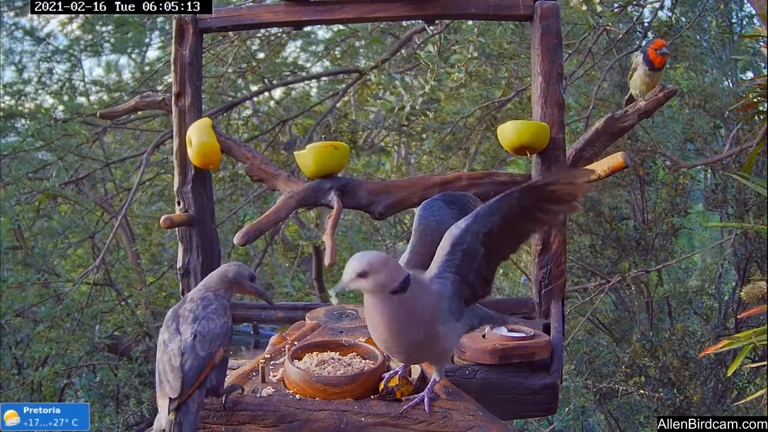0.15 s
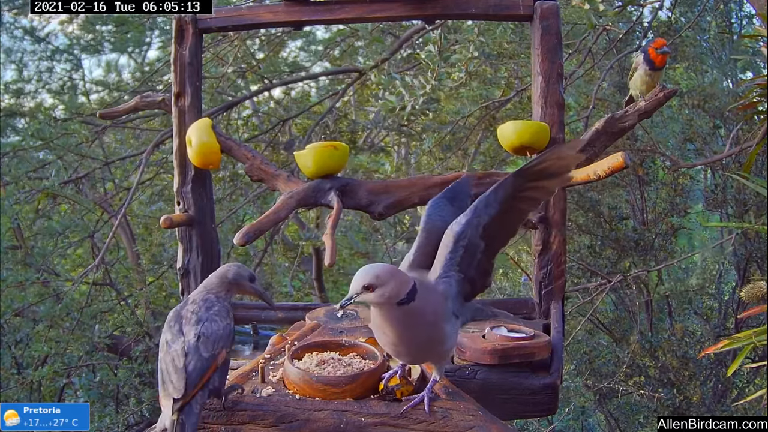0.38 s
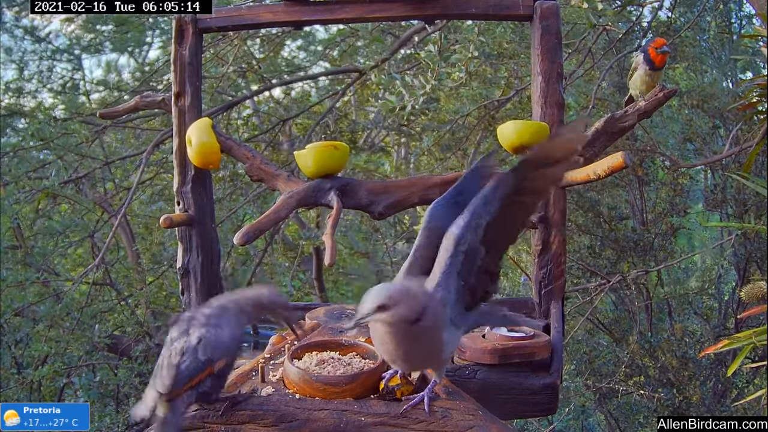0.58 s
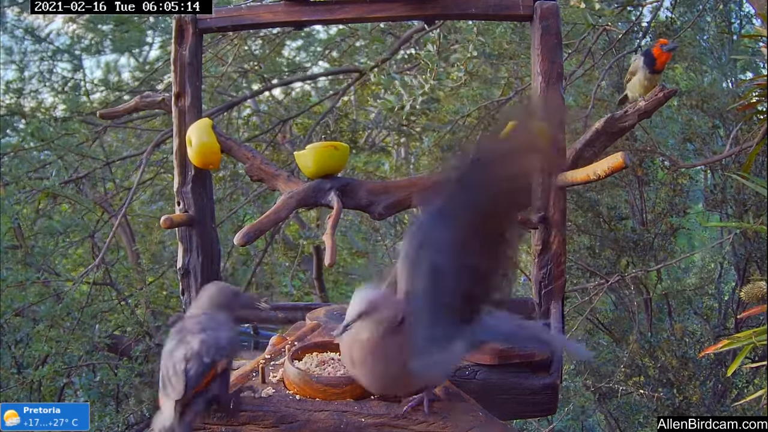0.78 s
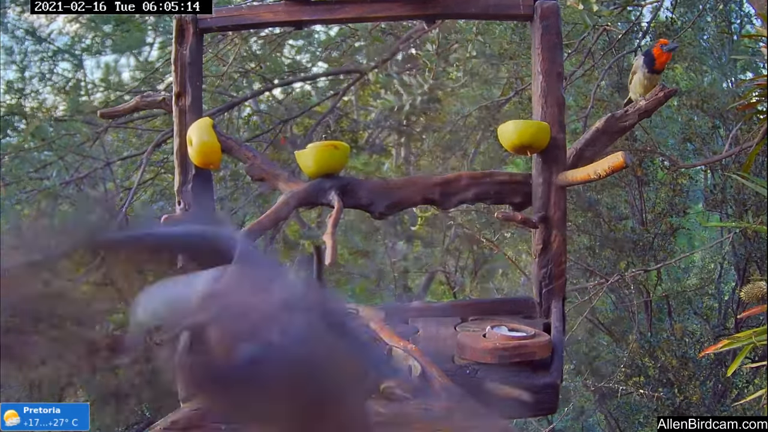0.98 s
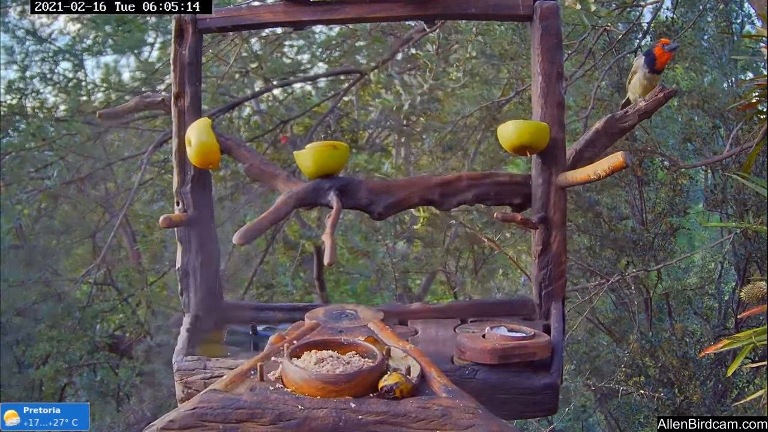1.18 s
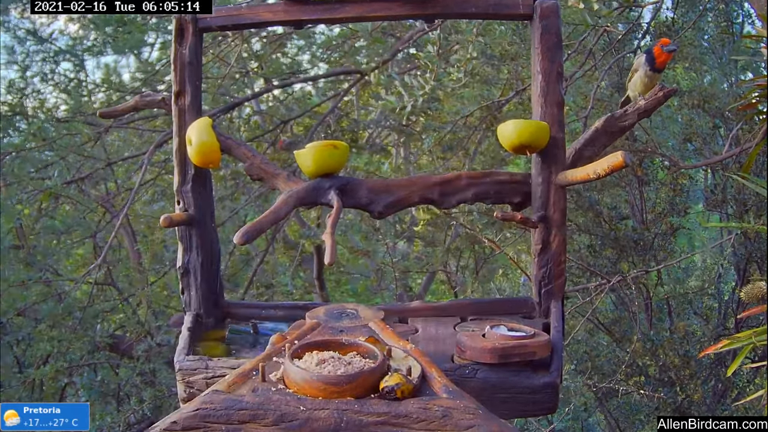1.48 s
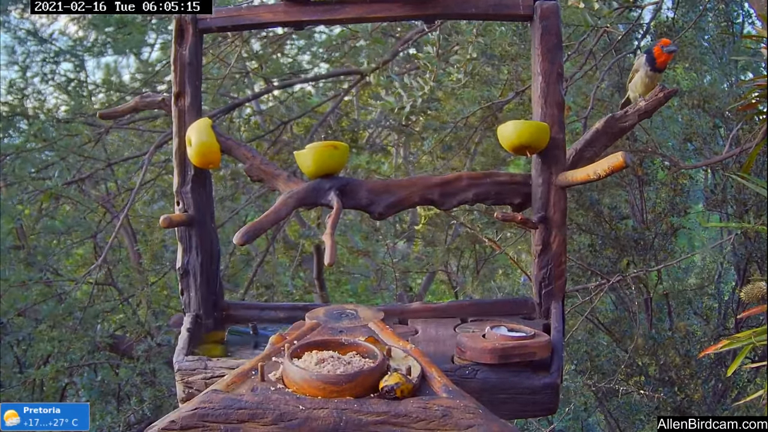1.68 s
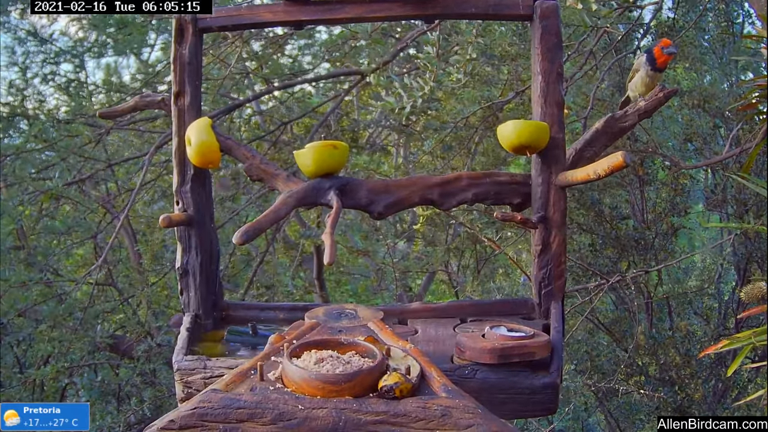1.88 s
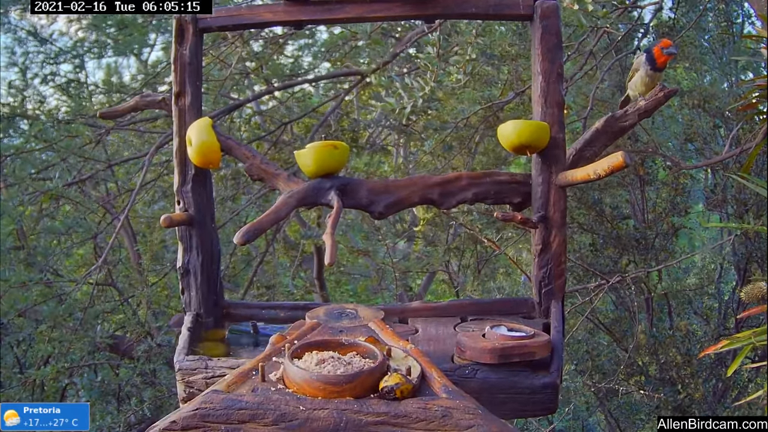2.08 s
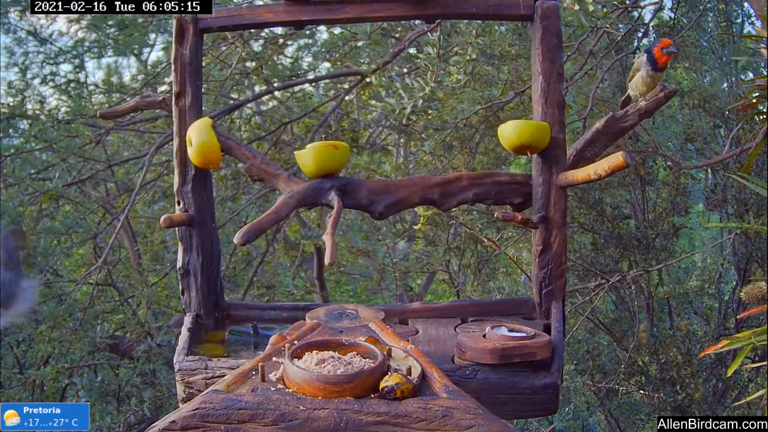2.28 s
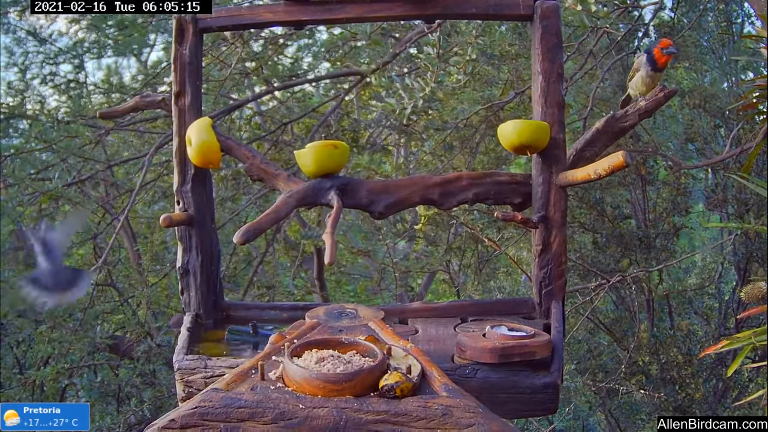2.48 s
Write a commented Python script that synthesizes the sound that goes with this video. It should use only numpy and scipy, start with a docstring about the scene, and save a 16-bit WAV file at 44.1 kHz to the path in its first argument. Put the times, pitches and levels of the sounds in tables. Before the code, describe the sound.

Close wing slaps and feathery swishes burst out just after one short chirp, as two doves take off from a garden feeder with soft wooden knocks. The flapping dies away while wind keeps rumbling on the microphone.

```python
"""A garden, close to a wooden feeder. Two doves scuffle and fly off: wings slap and clap, feathers swish
and whistle, downstrokes push air on the microphone, the planks knock and the seed dish rings.
A sharp chirp dies away at the start and small birds call far off. Wind buffets the microphone
over a distant traffic drone, a hum and faint hiss."""
import sys
import numpy as np
from scipy import signal
from scipy.fft import rfft, irfft, next_fast_len
from scipy.io import wavfile
from scipy.ndimage import uniform_filter1d, map_coordinates

SR = 44100
rng = np.random.default_rng(int(sys.argv[2]) if len(sys.argv) > 2 else 0)


def master(y):
    """Save y as 16-bit WAV."""
    cut = np.clip(np.atleast_2d(y).T, -1, 1)
    pcm = np.round(cut * 32767)  # scale
    wavfile.write(sys.argv[1], SR, pcm.astype(np.int16))


N = 116865
T = np.arange(N) / SR

# garden reverberation: freq_hz, t60_s
GARDEN_DECAY = [(500, 0.32), (3000, 0.15), (6000, 0.32), (10000, 0.13), (15000, 0.36)]


def amp(db):
    return 10 ** (np.asarray(db) / 20)


def unit_rms(x):
    return x / np.sqrt(np.mean(x ** 2) + 1e-20)


def log_interp(points, hz):
    """Interpolate (freq_hz, value) points on a log axis."""
    freqs_hz, values = np.transpose(points)
    return np.interp(np.log(hz + 1), np.log(freqs_hz + 1), values)


def bell(hz, centre_hz, width_oct):
    """Gaussian on a log axis, 1 at the centre."""
    return np.exp(-(np.log2((hz + 1) / centre_hz) / width_oct) ** 2)


def wobble(rate_hz, size=N):
    """Smooth random curve, rate_hz knots a second."""
    return map_coordinates(rng.standard_normal(int(size * rate_hz / SR) + 4), [T[:size] * rate_hz])


def filtered(x, response):
    """Apply the gain response(hz)."""
    n_fft = next_fast_len(len(x) + 8192)
    return irfft(rfft(x, n_fft) * response(np.fft.rfftfreq(n_fft, 1 / SR)), n_fft)[:len(x)]


def noise(spectrum, size=N):
    """Coloured noise, rms 1."""
    return unit_rms(filtered(rng.standard_normal(size), lambda hz: amp(log_interp(spectrum, hz))))


def patchy(x, depth_db):
    """Random louder and softer patches in time and frequency, rms 1."""
    bins = signal.stft(x, nperseg=1024)[2]
    field = uniform_filter1d(rng.standard_normal(bins.shape), size=5, axis=0)
    field = unit_rms(uniform_filter1d(field, size=5, axis=1))
    return unit_rms(signal.istft(bins * amp(depth_db * field), nperseg=1024)[1][:N])


def reverb_tail(decay):
    """Noise dying at a separate rate per frequency, energy 1."""
    hz, t, bins = signal.stft(rng.standard_normal(SR // 2), SR, nperseg=256)
    x = signal.istft(bins * amp(-60 * t / log_interp(decay, hz)[:, None]), SR, nperseg=256)[1]
    return x / np.linalg.norm(x)


def add(track, start_s, x):
    part = track[max(round(start_s * SR), 0):][:len(x)]
    part += x[:len(part)]


def hiss():
    """Microphone self-noise."""
    # freq_hz, gain_db
    spectrum = [(1180, -33.5), (2000, -5), (2500, -6.5), (2980, -2), (3600, -5.5), (14700, -24),
                (15800, -32)]
    return amp(-77.5 + 0.88 * wobble(30)) * noise(spectrum)


def drone():
    """Rush of far traffic and stirred air, with a distant narrow-band hum."""
    # rush contour: time_s, gain_db
    contour = [(0.0, -55.5), (0.29, -53), (0.41, -45.5), (0.52, -44.5), (1.01, -52), (1.76, -55.5),
               (2.23, -55), (2.39, -52), (2.62, -50.5)]
    # rush: freq_hz, gain_db
    spectrum = [(35, -23.5), (60, 1), (120, -8.5), (199, -17.5), (229, -10.5), (264, -12), (304, -10.5),
                (481, -20), (546, -14.5), (649, -17.5), (890, -20), (1220, -29.5), (1470, -29.5),
                (1590, -32.5), (2600, -56.5), (3380, -78.5), (5720, -120)]
    hum_hz, hum_width_hz, hum_db = 113.1, 8, -55.5
    level = amp(np.interp(T, *np.transpose(contour)) + 7.5)
    rush = patchy(amp(1.4 * wobble(44.85)) * noise(spectrum), depth_db=2.5)
    hum = filtered(rng.standard_normal(N), lambda hz: np.exp(-((hz - hum_hz) / hum_width_hz) ** 2))
    return level * rush + amp(hum_db) * unit_rms(hum)


def wind():
    """Gusts buffet the microphone: a deep, uneven rumble."""
    # time_s, level_db
    gusts = [(0, -55), (.12, -38), (.2, -38), (.3, -28), (.5, -28), (.8, -28.5), (1, -27.5), (1.15, -36.5),
             (1.35, -34), (1.5, -29), (1.58, -45), (1.66, -30), (1.8, -33.5), (2, -31.5), (2.2, -31),
             (2.28, -46), (2.38, -32), (2.65, -29.5)]
    # buffeting: freq_hz, gain_db
    spectrum = [(1.8, -32), (3.0, 0), (19, -2.5), (29, -9), (43, -10.5), (82, -22), (136, -40.5),
                (200, -39.5), (260, -73.5), (440, -120)]
    rumble = unit_rms(amp(1.6 * wobble(9)) * noise(spectrum))
    return amp(np.interp(T, *np.transpose(gusts))) * rumble


def far_birds():
    """Faint arched whistles, blurred by distance."""
    # start_s, length_s, start_hz, mid_hz, end_hz, level_db
    calls = [(0.982, 0.076, 3030, 3110, 3135, -72.5), (1.397, 0.036, 3475, 3740, 3444, -77.5),
             (1.438, .055, 3400, 3830, 3426, -80.5), (2.078, 0.082, 3050, 2990, 2750, -78.5),
             (2.166, 0.098, 2960, 3060, 3000, -82.5)]
    out = np.zeros(N)
    for start_s, length_s, start_hz, mid_hz, end_hz, level_db in calls:
        u = np.linspace(-1, 1, int(length_s * SR))
        pitch_hz = mid_hz + (end_hz - start_hz) * u / 2 + ((start_hz + end_hz) / 2 - mid_hz) * u * u
        tone = np.sin(2 * np.pi * np.cumsum(pitch_hz) / SR)
        add(out, start_s, amp(level_db) * np.sqrt(1 - u * u) * tone)
    direct = out * amp(5.7 * wobble(250))
    return direct + 0.86 * signal.fftconvolve(out, reverb_tail(GARDEN_DECAY))[:N]


def chirp():
    """A harsh near chip and its flickering echoes from the bushes."""
    # time_s, pitch_hz, level_db
    contour = [(0, 3530, -34), (.002, 4150, -25.5), (.005, 4400, -31.5), (.008, 4220, -28.5),
               (0.009, 3620, -59)]
    # freq_hz, gain_db
    echo_spectrum = [(1200, -32), (2000, -22.5), (3000, -13.5), (3900, -11), (4450, -2), (5000, -9),
                     (6500, -12.5), (7600, -25), (9600, -21), (13000, -49)]
    # freq_hz, t60_s
    echo_decay = [(2500, 0.17), (4400, 0.26), (6000, .22), (10000, 0.18)]
    roughness, overtone_db, echo_db = 0.69, -23.5, -38
    time_s, pitch_hz, level_db = np.transpose(contour)
    phase = 2 * np.pi * np.cumsum(np.interp(T, time_s, pitch_hz)) / SR
    envelope = amp(np.interp(T, time_s, level_db, right=-140)) * (1 + roughness * wobble(900))
    out = envelope * (np.sin(phase) + amp(overtone_db) * np.sin(2.2 * phase))
    echo = filtered(reverb_tail(echo_decay), lambda hz: amp(log_interp(echo_spectrum, hz)))
    echo /= np.std(echo[:SR // 50])
    add(out, 0, amp(echo_db) * echo * amp(1.2 * wobble(400, len(echo))))
    return out


def feeder_knocks():
    """Soft blows ring the planks, most strongly near each blow's centre frequency."""
    # start_s, level_db, centre_hz
    knocks = [(0.243, -31, 286), (.321, -35, 313), (0.478, -49, 305), (.604, -27, 330), (.635, -31, 280),
              (0.973, -33, 226), (1.074, -40, 305), (2.194, -41, 283), (2.235, -28, 225),
              (2.588, -40.5, 330)]
    # freq_hz, gain_db, t60_s
    plank_modes = [(113.7, -1, 0.11), (221.5, 0.5, 0.17), (301.4, 4.5, 0.11), (390, -10, 0.073),
                   (643, -11, 0.026)]
    rise_s = 0.0042
    out, t = np.zeros(N), T[:SR // 4]
    for start_s, level_db, centre_hz in knocks:
        ring = np.zeros(len(t))
        for hz, gain_db, t60_s in plank_modes:
            decay = amp(gain_db + rng.normal(0, 1.4) - 60 * t / t60_s)
            ring += bell(hz, centre_hz, width_oct=0.45) * decay * np.sin(2 * np.pi * hz * t)
        add(out, start_s, amp(level_db) * ring * (1 - np.exp(-t / rise_s)))
    return out


def air_puffs():
    """Downstrokes and gusts push air on the microphone; suction follows."""
    # peak_s, level_db, half_length_s
    puffs = [(0.367, -14, 0.018), (0.494, -13, 0.023), (0.613, -9.5, .014), (0.711, -18, 0.017),
             (0.812, -21, 0.017), (0.957, -25, 0.016), (1.251, -20, 0.051), (1.685, -19, 0.0241),
             (1.923, -24.5, 0.054), (2.063, -19.5, 0.029), (2.193, -17.5, 0.019)]
    out = np.zeros(N)
    for peak_s, level_db, half_length_s in puffs:
        u = (T - peak_s) / half_length_s
        push = np.exp(-2 * abs(u) ** 1.51)
        suction = 0.6 * np.exp(-(u - 1.71) ** 2)
        out += amp(level_db) * (push - suction)
    return out


def feather_swishes():
    """Feathers brush the air: one swell of noise per stroke."""
    # peak_s, level_db
    strokes = [(.232, -56.5), (.275, -69), (.3, -57), (.345, -55.5), (.385, -56), (0.422, -61.5),
               (0.468, -54), (0.509, -56.5), (.54, -62.5), (.605, -56.5), (.655, -68.5), (0.713, -60),
               (0.744, -69.5), (0.776, -75.5), (.82, -71), (0.869, -71), (.96, -73), (0.994, -75.5),
               (1.074, -71), (1.12, -76), (1.25, -80.5)]
    # swish: freq_hz, gain_db
    spectrum = [(700, -29.5), (1200, -4), (2000, -3.5), (2500, -5.5), (3200, 1), (5500, 3), (7000, -5.5),
                (9000, -16), (14000, -33)]
    rise_s, fall_s = 0.0075, 0.035
    envelope = np.zeros(N)
    for peak_s, level_db in strokes:
        width_s = np.where(T < peak_s, rise_s, fall_s)
        envelope += amp(level_db) * np.exp(-((T - peak_s) / width_s) ** 2)
    return envelope * amp(1.2 * wobble(130)) * patchy(noise(spectrum), depth_db=1.1)


def feather_whistles():
    """Feathers sound a brief fluttering tone on some strokes."""
    # time_s, level_db, pitch_hz, length_s
    whistles = [(0.36, -37, 653, 0.015), (0.494, -35, 836, 0.02), (0.513, -32, 854, 0.013),
                (0.522, -29.5, 820, 0.012), (0.599, -28, 870, 0.017), (0.728, -34.5, 766, 0.012),
                (0.749, -36.5, 673, 0.0098), (0.842, -45, 840, 0.011), (0.865, -33.5, 897, 0.018),
                (0.939, -46, 800, 0.013), (0.996, -43, 863, 0.012), (1.115, -40.5, 861, 0.013),
                (1.252, -41, 766, 0.0072), (1.33, -43, 766, 0.012), (1.551, -43, 895, 0.017)]
    out = np.zeros(N)
    for time_s, level_db, pitch_hz, length_s in whistles:
        t = T[:int(length_s * SR)]
        flutter = 0.9 + 0.43 * wobble(319, len(t))
        tone = np.sin(2 * np.pi * (pitch_hz * t + rng.random()))
        add(out, time_s - 0.002, amp(level_db) * np.hanning(len(t)) * flutter * tone)
    return out


def wing_thumps():
    """Body of the hardest slaps: one negative pressure pulse each."""
    # start_s, level_db, length_s
    thumps = [(.2442, -14, 0.0047), (0.26, -22.5, 0.0042), (0.3214, -23, 0.0026), (0.695, -27, 0.0022)]
    out = np.zeros(N)
    for start_s, level_db, length_s in thumps:
        add(out, start_s, -amp(level_db) * np.hanning(int(length_s * SR) + 2))
    return out


def wing_slaps():
    """Wing slaps and claw ticks: noise bursts that ring the seed dish and echo in the garden."""
    # start_s, peak_db, centre_hz, low_db, decay_s, tilt_db_per_oct, ring_db
    hits = [(0.2385, -26, 6050, -4, 0.01, -4, -40), (.2441, -6.5, 3830, -1, 0.0018, 0, -36),
            (0.2477, -15.5, 5240, 1, 0.0033, 0.5, -38), (0.2587, -12.5, 6900, -4.5, 0.0029, -2, -40),
            (0.29, -40.5, 5040, 1, 0.0049, -3.5, -37), (0.3193, -21, 3960, -6.5, 0.002, -9.5, -35),
            (0.329, -34.5, 4040, -14, 0.0017, -2, -41), (0.459, -38.5, 6500, -11, 0.0077, -3, -30),
            (0.5803, -37.5, 3870, -3, 0.0066, -15.5, -4.5), (0.6953, -35, 3300, 3.5, 0.0018, -8.5, -7),
            (0.942, -46, 5600, -3, 0.0027, -1, -3), (1.0411, -53.5, 4200, 5.5, .004, -4, -10),
            (1.089, -52.5, 2600, -9, .003, -13, -4), (1.195, -63, 7060, -12, .005, -1.5, -17),
            (1.3904, -64, 7500, -11, .005, -1, -20), (1.639, -61.5, 4500, -9, .004, 3, -19.5),
            (2.275, -68.5, 7930, -18, .002, 5, -40), (2.395, -68.5, 12000, -22, 0.0021, 5.5, -37.5),
            (2.437, -66, 11920, -18, 0.0019, 5.5, -38), (2.555, -67, 11000, -21, .002, 0, -41),
            (2.595, -61.5, 12000, -20, .002, 3, -37.5)]
    # freq_hz, gain_db
    bright_spectrum = [(900, -40.5), (1700, -6), (1900, -2), (2740, -9.5), (3330, -4.5), (4000, -7),
                       (6800, -2.5), (8300, -9), (10000, -10.5), (12200, -18.5), (13400, -27.5),
                       (15000, -17.5), (15800, -20), (17000, -41)]
    # freq_hz, gain_db
    low_spectrum = [(53, -29), (90, -2.5), (162, -11.5), (571, -1), (1090, -1), (1230, -5), (1500, -20.5),
                    (1950, -49.5), (3300, -120)]
    # freq_hz, gain_db, t60_s
    dish_modes = [(2650, 3, 0.041), (3142, -6, .08), (4330, -7.5, .05), (4750, 1.5, 0.05),
                  (5400, -8.5, 0.1), (5800, -8.5, .04), (5740, -9, .04), (7000, -1.5, 0.04),
                  (7600, -5, 0.036), (9300, -3, .05)]
    emphasis_db, rattle_db, echo_db, echo_delay_s = 9.5, 3.5, -13.5, 0.004
    out, t = np.zeros(N), T[:SR // 8]
    for start_s, peak_db, centre_hz, low_db, decay_s, tilt_db_per_oct, ring_db in hits:
        def colour(hz):
            treble_db = tilt_db_per_oct * np.log2(1 + hz / 5000)
            return amp(emphasis_db * bell(hz, centre_hz, width_oct=0.24) + treble_db)

        u = t / decay_s
        bright = unit_rms(filtered(noise(bright_spectrum, len(t)), colour))
        low = amp(low_db) * noise(low_spectrum, len(t))
        slap = np.exp(-u) * (1 - np.exp(-u / 0.14)) * (bright + low)
        for hz, gain_db, t60_s in dish_modes:
            envelope = amp(ring_db + gain_db + rng.normal(0, 3.6) - 60 * t / t60_s) * (1 - np.exp(-u))
            rattle = amp(rattle_db * wobble(130, len(t)))
            slap += bell(hz, centre_hz, width_oct=1) * envelope * rattle * np.sin(2 * np.pi * hz * t)
        slap *= amp(peak_db) / np.abs(slap).max()
        echo = signal.fftconvolve(slap, reverb_tail(GARDEN_DECAY))
        add(out, start_s, slap)
        add(out, start_s + echo_delay_s, amp(echo_db) * echo)
    return out


def scene():
    """Doves, feeder and other birds over the background, mono."""
    doves = wing_slaps() + wing_thumps() + air_puffs() + feather_whistles() + feather_swishes()
    return (doves + feeder_knocks() + chirp() + far_birds() + wind() + drone() + hiss())[None]


def record(dry):
    """Steep low-pass, silent above stop_hz."""
    stop_hz, slope_width_hz = 15910, 500
    return filtered(dry[0], lambda hz: np.clip((stop_hz - hz) / slope_width_hz, 0, 1) ** 2)[None]


dry = scene()
out = record(dry)
master(out)
```